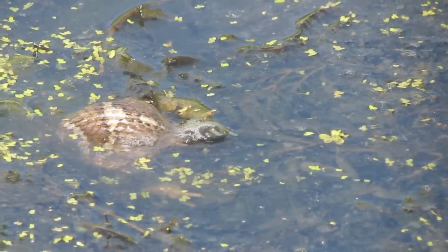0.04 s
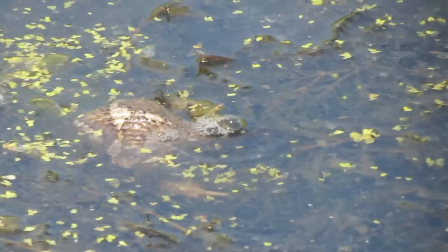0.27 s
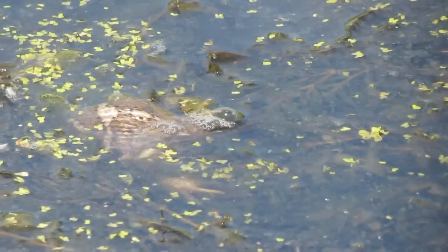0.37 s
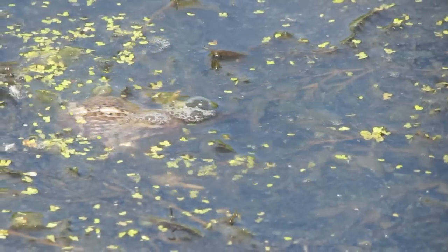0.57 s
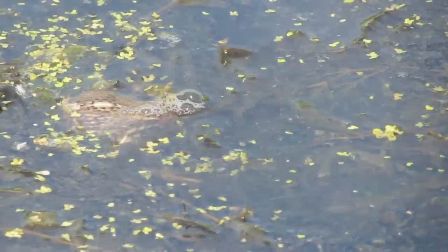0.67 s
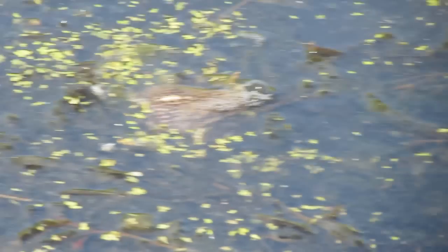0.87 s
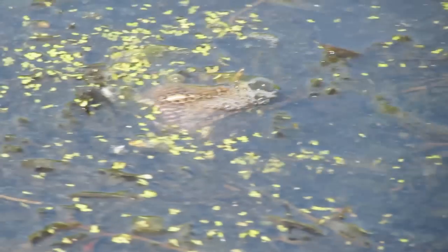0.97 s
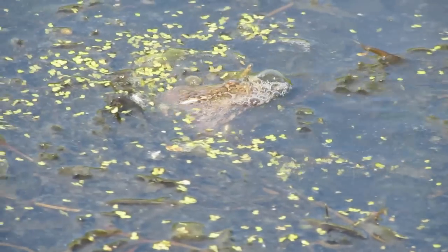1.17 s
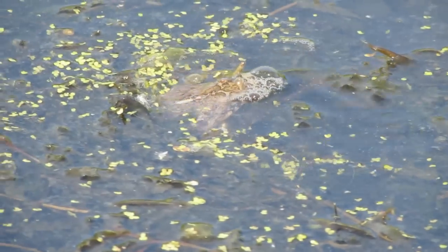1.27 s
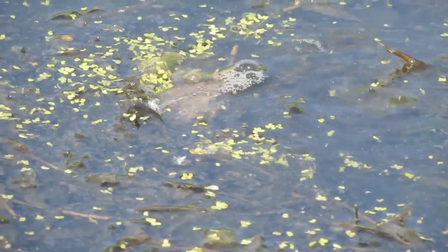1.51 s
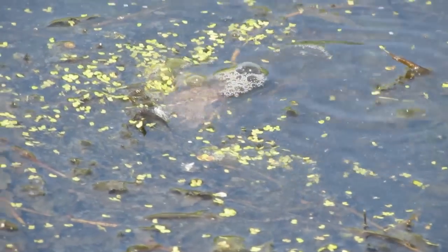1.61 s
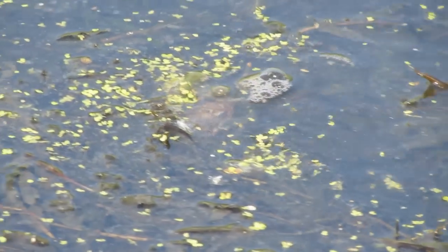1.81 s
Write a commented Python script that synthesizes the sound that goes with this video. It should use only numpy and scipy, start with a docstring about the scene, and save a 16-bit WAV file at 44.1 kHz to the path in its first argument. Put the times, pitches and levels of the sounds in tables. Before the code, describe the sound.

A small frog repeats a dry, high rattle about three times a second at a pond. A gust rumbles on the microphone with faint handling scuffs, while a songbird gives three falling whistles and other birds peep faintly.

```python
"""Pond frog, birds and a gust

A small frog calls about three times a second: a soft tick or two, then a dry rattle of larynx
snaps ringing its throat. A songbird answers with down-slurred whistles. Other birds add a buzz, far
slurs and a thin steady high whistle that swells twice, then three short, higher peeps.
Eddies buffet the microphone for about a second; a hand brushes the camera."""
import sys
import numpy as np
from scipy import signal
from scipy.fft import rfft, irfft
from scipy.io import wavfile
from scipy.ndimage import uniform_filter1d, map_coordinates

SR = 44100
rng = np.random.default_rng(int(sys.argv[2]) if len(sys.argv) > 2 else 0)


def to_wav(s):
    """Save 16-bit WAV."""
    ch = np.atleast_2d(s).T  # columns
    pcm = np.round(np.clip(ch, -1, 1) * 32767)  # PCM
    wavfile.write(sys.argv[1], SR, pcm.astype(np.int16))


N = 81585
T = np.arange(N) / SR

# outdoor air: f/Hz, density/dB
AIR_SPECTRUM = [(20, 6), (100, 0), (300, -9.5), (600, -6.5), (1200, -13), (2200, -16.5), (3300, -14),
                (4300, -21), (7000, -23), (13500, -31.5)]
# hand scuffs: t/s, length/s, level/dB
SCUFFS = [(.39, .016, -39), (0.415, 0.0047, -47), (.462, 0.0072, -48), (0.509, 0.0031, -41),
          (.986, .006, -50)]
# scuff noise: f/Hz, density/dB
SCUFF_SPECTRUM = [(300, -3), (1500, -10), (4000, 0.5), (7500, -0.5), (10000, -7), (14000, -11)]
# gust envelope: t/s, level/dB
GUST_ENVELOPE = [(0, -37.5), (.15, -39), (.25, -27), (.34, -30), (.42, -16.5), (.55, -23.5), (.68, -21),
                 (.78, -30), (.93, -22.5), (1.03, -25), (1.15, -28), (1.28, -31), (1.38, -47),
                 (1.85, -54.5)]
# puffs within the gust: t/s, level/dB
GUST_PUFFS = [(0.066, -27), (0.179, -25.5), (0.206, -27.5), (0.315, -19), (.358, -10.5), (0.389, -11.5),
              (.42, -10.5), (0.456, -8), (0.479, -10), (0.541, -11.5), (0.589, -13.5), (0.614, -18),
              (0.647, -13.5), (0.671, -11.5), (.698, -12.5), (0.737, -15.5), (.757, -15), (0.809, -12),
              (0.827, -16.5), (0.866, -14.5), (0.915, -14), (.953, -13), (0.993, -15), (1.069, -18),
              (1.096, -18), (1.125, -13.5), (1.165, -20), (1.205, -19), (1.234, -20.5), (1.301, -22)]
# eddies at full strength: f/Hz, density/dB
EDDY_SPECTRUM = [(15, -43), (60, -2.5), (120, -0.5), (220, -2.5), (380, -14), (650, -28.5), (1100, -51),
                 (2200, -86), (6000, -99)]
# hard buffets: t/s, level/dB, centre f/Hz
WIND_BUFFETS = [(.395, -2, 124), (.425, 3, 238), (.507, 4.5, 241), (0.741, -4, 226), (0.913, -4.5, 86),
                (0.991, 0, 162.4), (1.235, -11, 71.7), (1.303, -11.5, 68)]
# far birds: t/s, length/s, start f/Hz, end f/Hz, level/dB
FAR_SLURS = [(-.01, 0.063, 3700, 3286, -39), (0.034, 0.045, 3650, 3440, -42),
             (0.112, 0.029, 3450, 3240, -46.5), (0.402, 0.061, 2850, 2435, -47.5),
             (.47, 0.0596, 2250, 2010, -45.5), (1.028, 0.072, 4150, 3970, -57.5),
             (1.68, .08, 2280, 2125, -52.5)]
# steady high whistle, its two swells, three higher peeps: t/s, length/s, top f/Hz, bend/Hz, level/dB
HIGH_WHISTLE_AND_PEEPS = [(-.1, 0.41, 5978, 20, -52.5), (0.051, 0.049, 5964, 35, -41),
                          (0.151, 0.045, 5965, 73, -40), (0.52, 0.038, 7620, 120, -50),
                          (0.861, .045, 7500, 200, -47), (1.199, 0.049, 7480, 175, -48)]
# songbird: t/s, length/s, level/dB, final upturn/Hz
SONG_WHISTLES = [(0.602, .217, -34, 202), (0.935, .21, -29.5, 70), (1.275, 0.187, -30.5, 25)]
# frog throat modes: frequency ratio, level/dB, time to peak/s, envelope exponent
THROAT_MODES = [(1.02, -1, 0.00088, 1.63), (.985, -16.5, 0.0012, 0.42), (.77, -22.5, 0.0015, 1.03),
                (1.56, -19, 0.0003, 0.6)]
# soft frog ticks: t/s, level/dB
FROG_TICKS = [(.179, -22.5), (0.5117, -25.5), (0.8471, -22), (0.853, -25.5), (1.187, -23.5),
              (1.1927, -27.5), (1.5176, -22.5), (1.524, -24.5), (1.8234, -22.5), (1.8331, -21)]
# frog rattles: t/s, level/dB, click spacing/s
FROG_RATTLES = [(0.2189, -13, 0.007), (0.557, -17, 0.0069), (0.8897, -12.5, 0.0075), (1.2337, -13.5, .0068),
                (1.5588, -14.5, 0.0067)]


def amp(db):
    """Decibels to gain."""
    return 10 ** (np.asarray(db) / 20)


def add(mix, start_s, sound):
    """Mix in at start_s, cropping overhang."""
    at = round(start_s * SR)
    part = mix[max(at, 0):][:max(len(sound) + min(at, 0), 0)]
    part += sound[max(-at, 0):][:len(part)]


def noise(spectrum):
    """Shaped noise, rms 1."""
    hz, db = np.transpose(spectrum)
    gain = amp(np.interp(np.log(np.fft.rfftfreq(N, 1 / SR) + 1), np.log(hz), db))
    x = irfft(rfft(rng.standard_normal(N)) * gain, N)
    return x / x.std()


def waver(t, max_hz):
    """Random drift, rms 1."""
    rates_hz = max_hz * np.geomspace(.15, 1, 16)[:, None]
    return np.sin(2 * np.pi * (rates_hz * t + rng.random((16, 1)))).sum(0) / np.sqrt(8)


def echo(x, t60_s, build_s):
    """Scatter from banks and plants, different in each ear."""
    t = np.arange(SR // 2) / SR
    taps = rng.standard_normal((2, len(t))) * amp(-60 * t / t60_s) * np.minimum(t / build_s, 1)
    taps /= np.linalg.norm(taps, axis=1, keepdims=True)
    return signal.fftconvolve(x[None], taps, axes=1)[:, :N]


def tone(hz):
    """Sine along a pitch curve."""
    return np.sin(2 * np.pi * np.cumsum(hz) / SR)


def air():
    """Quiet outdoor noise, level drifting."""
    return amp(-49.5 + 1.58 * waver(T, 5.64)) * np.array([noise(AIR_SPECTRUM), noise(AIR_SPECTRUM)])


def handling():
    """A hand scuffs the camera body: short noise bursts."""
    x = np.zeros((2, N))
    for start_s, length_s, db in SCUFFS:
        envelope = amp(db) * np.sin(np.pi * np.clip((T - start_s) / length_s, 0, 1))
        x += envelope * np.array([noise(SCUFF_SPECTRUM), noise(SCUFF_SPECTRUM)])
    return x * amp([[-3], [0]])


def small_birds():
    """Right: a thin steady whistle swells twice, then three higher peeps. Left: far falling slurs."""
    high, slurs = np.zeros((2, N))
    for start_s, length_s, top_hz, bend_hz, db in HIGH_WHISTLE_AND_PEEPS:
        u = np.linspace(0, 1, round(length_s * SR))
        add(high, start_s, amp(db) * np.sin(np.pi * u) * tone(top_hz - bend_hz * (2 * u - 1) ** 2))
    for start_s, length_s, from_hz, to_hz, db in FAR_SLURS:
        u = np.linspace(0, 1, round(length_s * SR))
        hz = from_hz + (to_hz - from_hz) * u + 45 * waver(u * length_s, 177)
        add(slurs, start_s, amp(db) * np.sin(np.pi * u) * tone(hz))
    direct = np.array([amp(-11) * high + slurs, high + amp(-16) * slurs])
    return direct + echo(amp(-17) * high + amp(-9.5) * slurs, t60_s=.28, build_s=.013)


def bird_buzz(start_s=.262, length_s=.163, from_hz=3550, to_hz=4170, shake_hz=144, swing_hz=238):
    """A rising tone shaken in pitch and level; a lower voice fills its dips."""
    t = np.arange(0, length_s, 1 / SR)
    u = t / t[-1]
    shake = np.sin(2 * np.pi * shake_hz * t)
    hz = from_hz + (to_hz - from_hz) * np.sqrt(u) + swing_hz * shake + 80 * waver(t, 500)
    upper = (1 - .82 * shake) * tone(hz)
    lower = amp(3.5) * np.maximum(shake, 0) * tone(.87 * hz + 170 * waver(t, 750))
    x = np.zeros(N)
    add(x, start_s, amp(-39.5) * np.sin(np.pi * u) * (upper + lower))
    return amp([[-10], [-3]]) * x + amp(-10) * echo(x, t60_s=.41, build_s=.015)


def songbird(base_hz=2983, swoop_hz=1156, sag_hz=238, hold_s=.071, fade_db_per_s=135):
    """Whistles on the right: each swoops down, settles and fades with a slight upturn."""
    x = np.zeros(N)
    for start_s, length_s, db, upturn_hz in SONG_WHISTLES:
        t = np.arange(0, length_s, 1 / SR)
        hz = base_hz + swoop_hz * np.exp(-t / .012) + sag_hz * np.exp(-t / .05) + 9 * waver(t, 34.6)
        hz += upturn_hz * np.exp((t - length_s) / .0232)
        gate = np.clip(np.minimum(t / .0018, (length_s - t) / .0033), 0, 1)
        level_db = db - fade_db_per_s * np.maximum(t - hold_s, 0) + .28 * waver(t, 61.8)
        add(x, start_s, gate * amp(level_db) * tone(hz))
    return np.array([amp(-13) * x, x]) + amp(-16) * echo(x, t60_s=.18, build_s=.0057)


def wind(puff_s=.0125, full_db=-8.5, speed_exponent=.27, left_lag_s=.00008):
    """Eddies sweep past faster in each puff, pushing the two channels in opposite directions."""
    power = amp(np.interp(T, *np.transpose(GUST_ENVELOPE)) + 2 * waver(T, 35)) ** 2
    power += sum((amp(db) * np.exp(-((T - at_s) / puff_s) ** 2)) ** 2 for at_s, db in GUST_PUFFS)
    gust_db = 10 * np.log10(power)
    speed = amp(speed_exponent * np.clip(gust_db - full_db, -18, 6))
    eddies = map_coordinates(noise(EDDY_SPECTRUM), [np.cumsum(speed)], order=3, mode="wrap")
    pressure = amp(gust_db) * eddies
    for at_s, db, hz in WIND_BUFFETS:
        u = (np.pi * hz * (T - at_s)) ** 2
        pulse = (1 - 2 * u) * np.exp(-u)
        edge = amp(-20.5) / (1 + .93 * u) ** 4
        pressure -= amp(db) * (pulse + edge)
    rumble = amp(gust_db - 15) * noise([(20, -9), (90, 13.5), (250, -9), (700, -55), (3000, -78)])
    left = rumble - amp(-7.5) * np.interp(T - left_lag_s, T, pressure)
    return np.array([left, pressure])


def frog_click(hz):
    """One larynx snap rings the throat modes."""
    t = np.arange(1, SR // 70) / SR
    hz *= 1 + .008 * rng.standard_normal()
    x = np.zeros(len(t))
    for ratio, db, peak_s, exponent in THROAT_MODES:
        envelope = (t / peak_s * np.exp(1 - t / peak_s)) ** exponent
        x += amp(db) * envelope * np.sin(2 * np.pi * hz * ratio * t)
    return x


def frog(clicks=10, tick_hz=3046, tick_low_hz=2340, rattle_hz=3138, rise_hz=240, hurry_s=.005):
    """Ticks and uneven rattles on the left; each rattle climbs in pitch, then hurries and weakens."""
    x = np.zeros(N)
    for start_s, db in FROG_TICKS:
        add(x, start_s, amp(db) * (frog_click(tick_hz) + amp(-12.5) * frog_click(tick_low_hz)))
    for start_s, db, spacing_s in FROG_RATTLES:
        for k, (time_jitter, level_jitter) in enumerate(rng.standard_normal((clicks, 2))):
            u = k / (clicks - 1)
            pause_s = (.0015 + .00025 * time_jitter) * (k > 0)  # first gap is longer
            at_s = start_s + k * spacing_s + pause_s - hurry_s * u ** 7
            level_db = db - 11.5 * u ** 3.8 + .6 * level_jitter
            add(x, at_s, amp(level_db) * frog_click(rattle_hz + rise_hz * u))
    right = amp(-13.5) * np.interp(T - .00023, T, x)
    near_echo = amp(-10) * echo(x, t60_s=.21, build_s=.0016)
    far_echo = amp(-23.5) * echo(x, t60_s=.37, build_s=.034)
    return np.array([x, right]) + near_echo + far_echo


def scene():
    """Stereo sum of all sources."""
    return frog() + songbird() + small_birds() + bird_buzz() + wind() + handling() + air()


def record(dry):
    """A limiter ducks everything at the hardest buffets and recovers slowly; then a low-pass."""
    recovery_db_per_s, cutoff_hz = 5.5, 14100
    recovery_db = T * recovery_db_per_s
    over_db = 20 * np.log10(np.maximum(abs(dry).max(0), 1))
    duck_db = uniform_filter1d(np.maximum.accumulate(over_db + recovery_db) - recovery_db, size=120)
    limited = np.clip(dry / amp(duck_db), -1, 1)
    lowpass = signal.firwin(255, cutoff_hz, window=("kaiser", 8), fs=SR)
    return signal.oaconvolve(limited, lowpass[None], "same")


dry = scene()
out = record(dry)
to_wav(out)
```